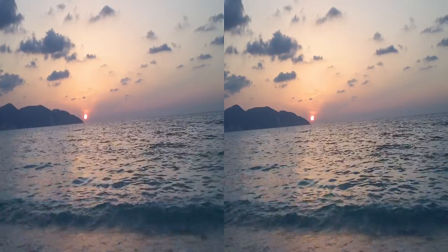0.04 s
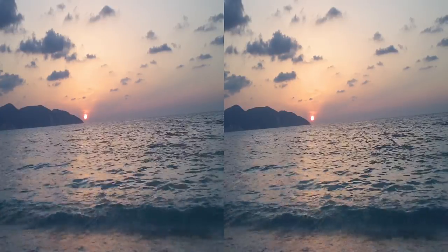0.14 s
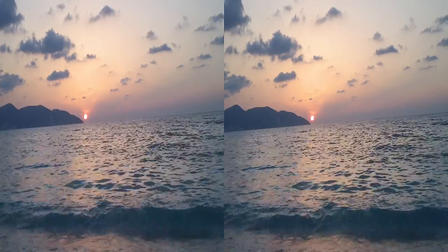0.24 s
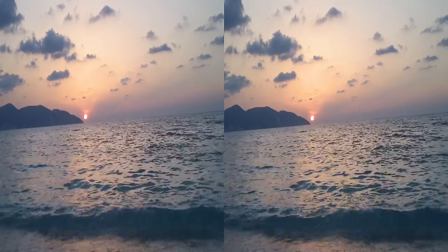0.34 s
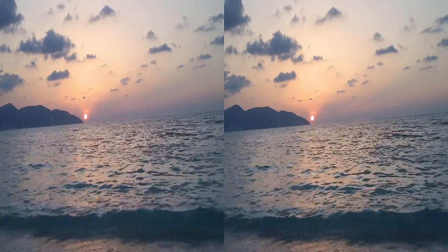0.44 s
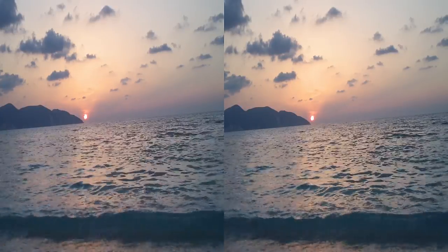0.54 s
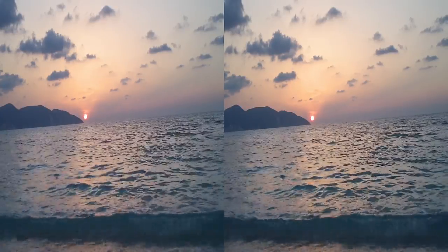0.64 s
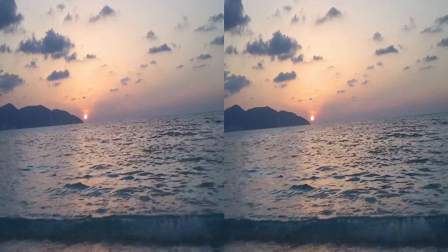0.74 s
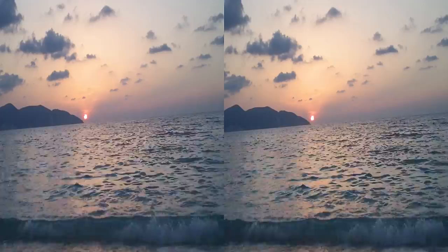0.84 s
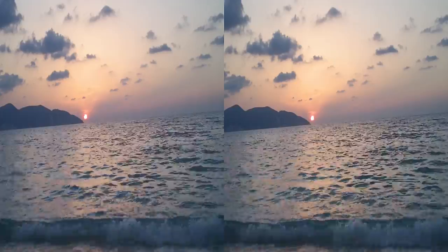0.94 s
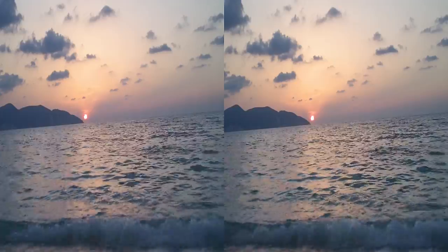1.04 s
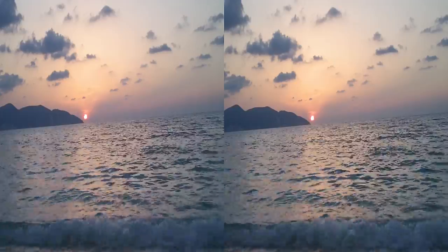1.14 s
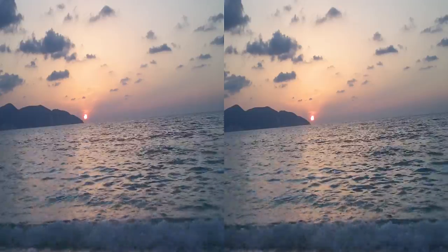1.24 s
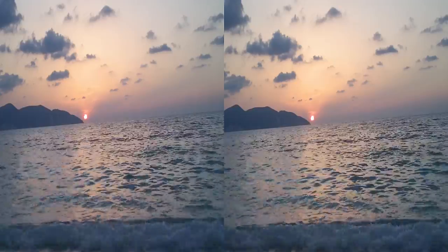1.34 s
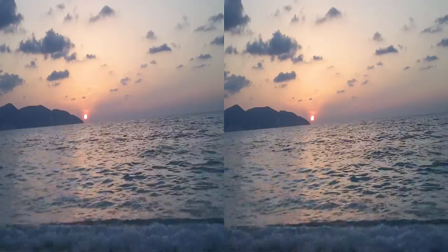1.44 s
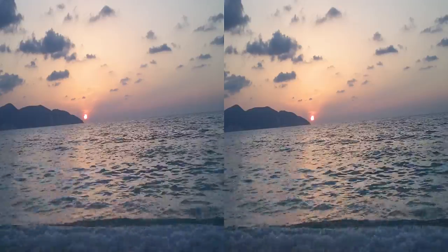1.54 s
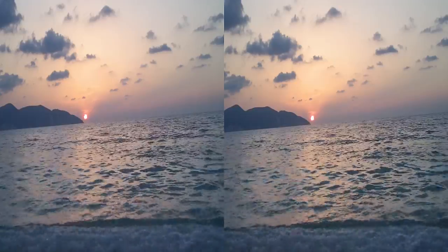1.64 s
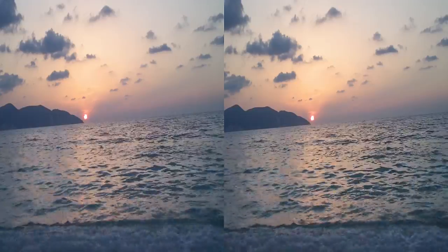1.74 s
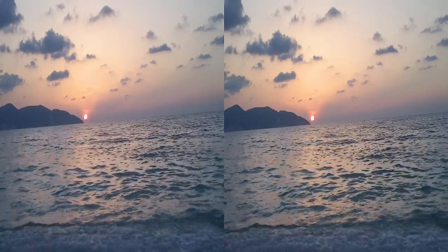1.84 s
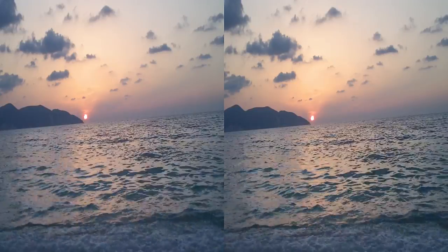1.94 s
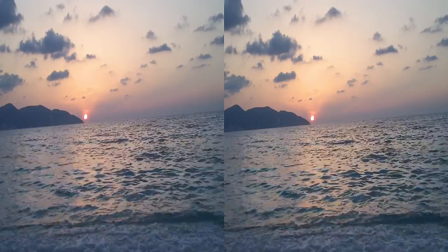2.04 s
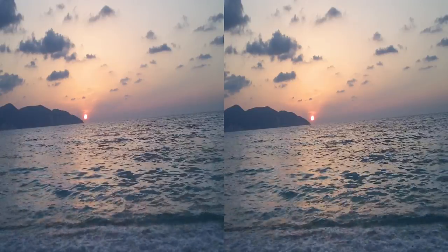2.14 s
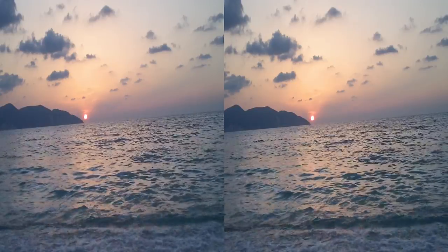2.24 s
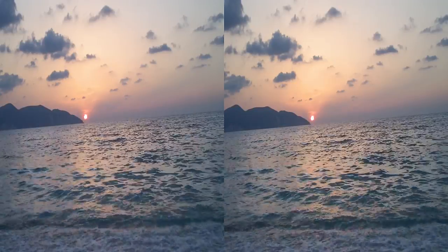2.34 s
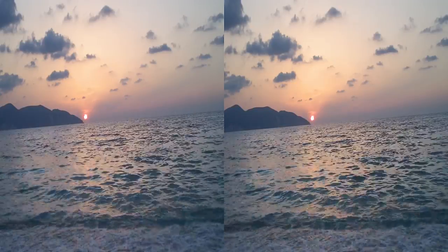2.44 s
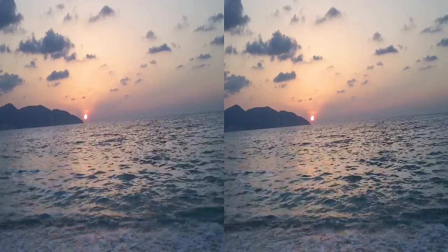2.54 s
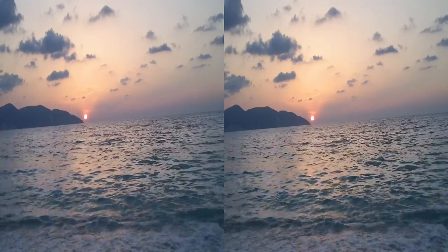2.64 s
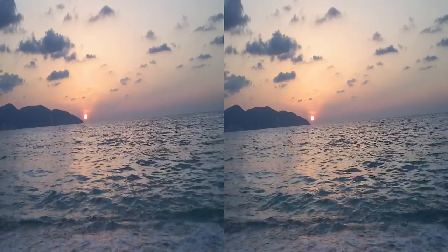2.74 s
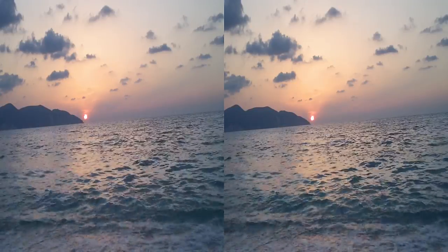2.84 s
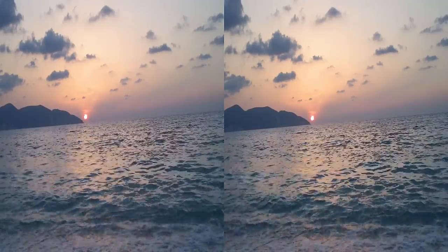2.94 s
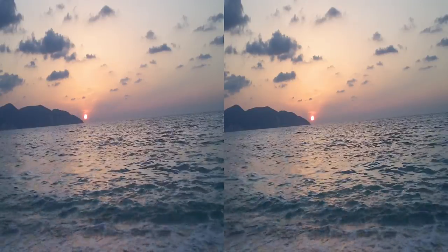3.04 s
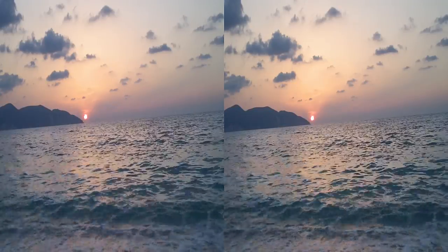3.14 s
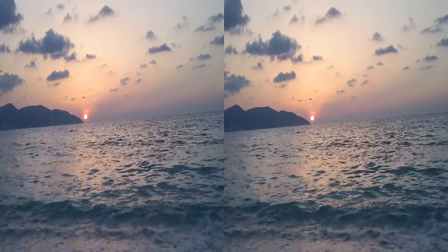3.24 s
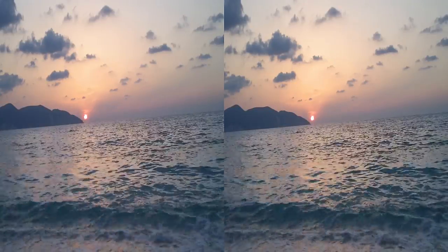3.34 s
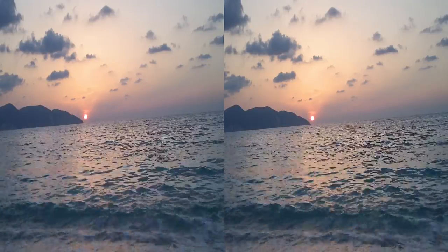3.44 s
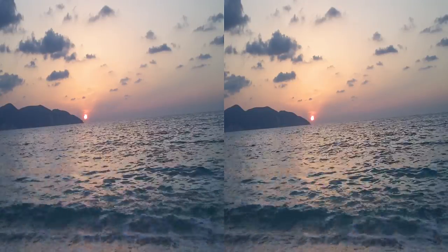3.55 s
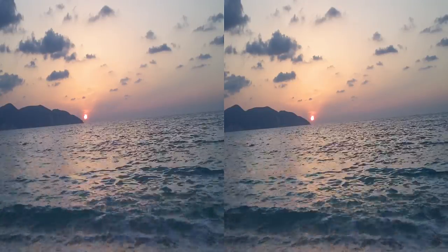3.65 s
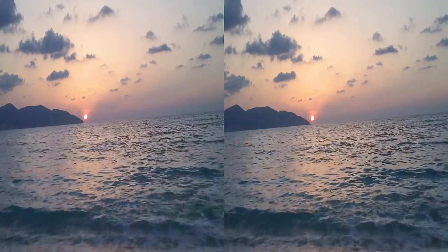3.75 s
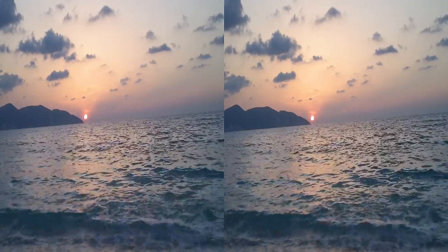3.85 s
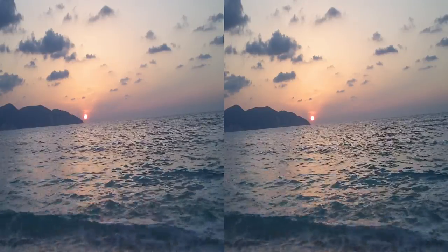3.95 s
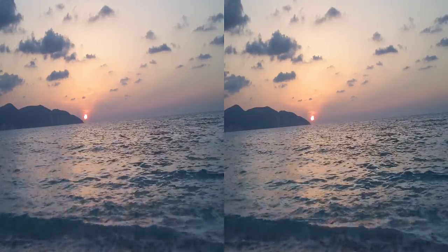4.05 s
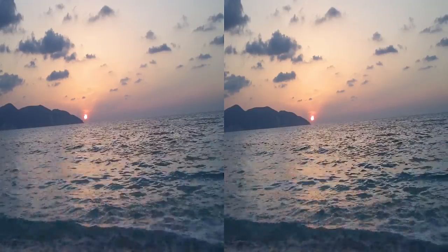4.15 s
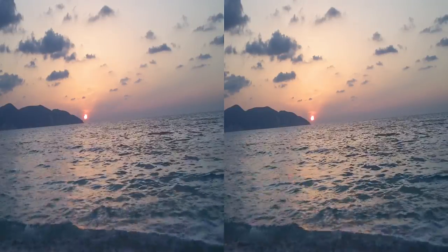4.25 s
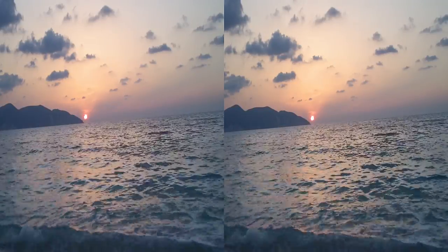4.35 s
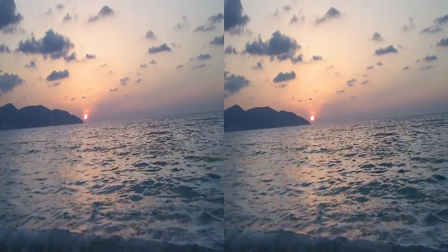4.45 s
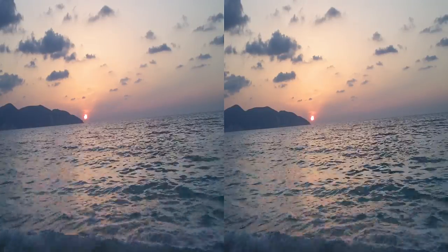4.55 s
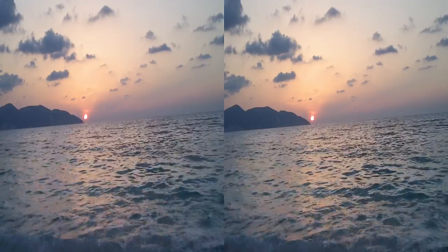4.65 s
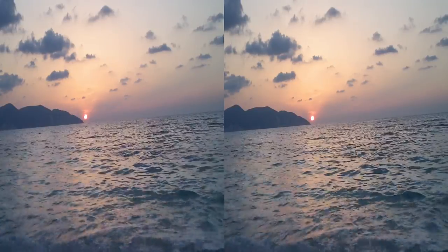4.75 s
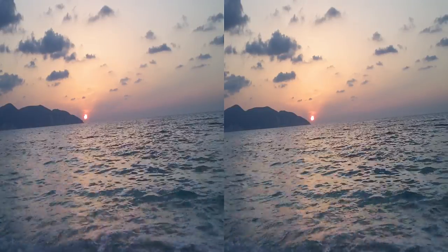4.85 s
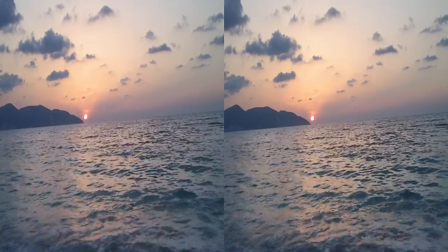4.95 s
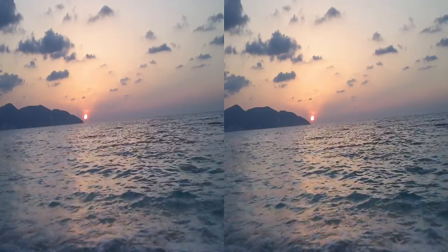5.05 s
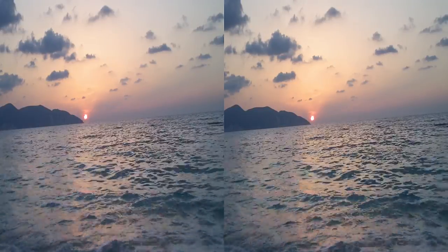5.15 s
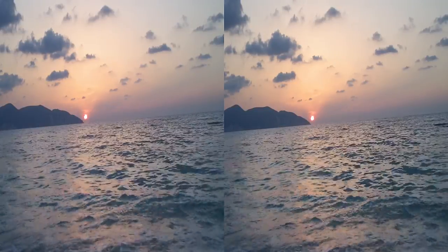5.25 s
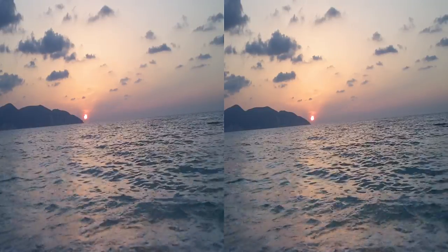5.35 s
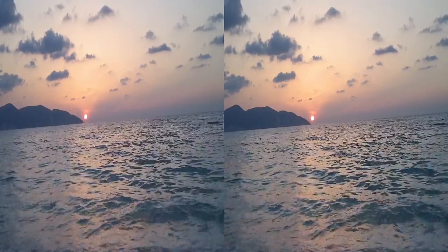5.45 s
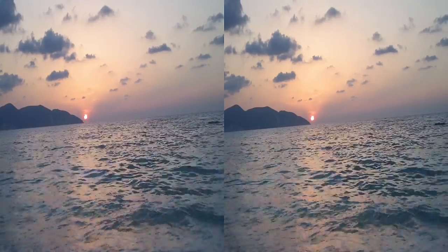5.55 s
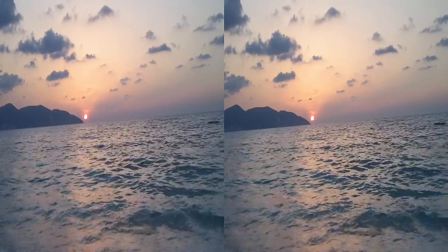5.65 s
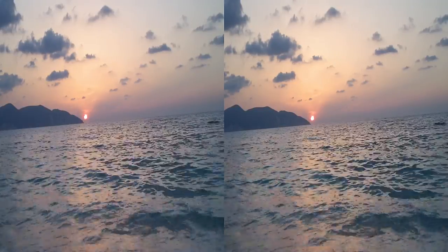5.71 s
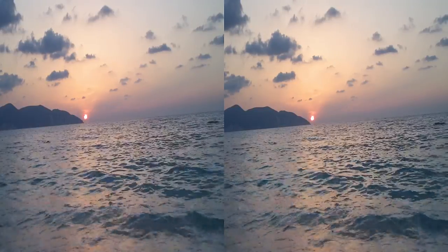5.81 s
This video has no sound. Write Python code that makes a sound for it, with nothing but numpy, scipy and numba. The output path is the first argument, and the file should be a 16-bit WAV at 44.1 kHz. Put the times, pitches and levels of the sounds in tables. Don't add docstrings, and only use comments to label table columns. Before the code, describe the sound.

Loud low wind buffeting thumps the microphone throughout, wide and occasionally distorting. Behind it, faint water hiss, then a small wave breaks just before one second with gulping bubbles, washes out in a long fading rush, and a second, softer wave breaks between four and five seconds. Outdoors at the waterline, close hand-held stereo microphone.

```python
import sys
import numpy as np
from scipy import signal
from scipy.fft import rfft, irfft
from scipy.io import wavfile
from scipy.ndimage import uniform_filter1d
from numba import njit

SR = 44100
rng = np.random.default_rng(int(sys.argv[2]) if len(sys.argv) > 2 else 0)


def wrap_up_sound(samples):
    columns = np.atleast_2d(samples).T
    tamed = np.clip(columns, -1, 1)
    steps = np.round(tamed * 32767).astype(np.int16)
    wavfile.write(sys.argv[1], SR, steps)


def voltage_ratio(level):
    return 10 ** (np.asarray(level, float) / 20)


N = 259308
HZ = np.maximum(np.arange(N // 2 + 1) * SR / N, 1.)


def colour(table):
    hz, db = np.transpose(table)
    return voltage_ratio(np.interp(np.log(HZ), np.log(hz), db))


def curves(table):
    s, *columns = np.transpose(table)
    return np.array([np.interp(np.arange(N) / SR, s, column) for column in columns])


def walk(rate_hz):
    hold = max(int(SR / rate_hz), 2)
    steps = np.repeat(rng.standard_normal(N // hold + 1), hold)[:N]
    drift = uniform_filter1d(uniform_filter1d(steps, hold), hold)
    return drift / drift.std()


# (frequency [Hz], level [dB per Hz])
SUM_COLOUR = [(50, -44), (150, -8.5), (300, 1.5), (800, -1), (1200, -5), (2000, -11), (4000, -20),
              (6000, -21), (8000, -25), (12000, -26.5), (15500, -36.5)]
# (frequency [Hz], level [dB per Hz])
DIFF_COLOUR = [(100, -19), (300, -9), (600, -5.5), (1000, -6.5), (1500, -10.5), (2500, -11), (4000, -13),
               (6000, -13), (8000, -15.5), (12500, -17), (15500, -21.5)]
# (low edge [Hz], high edge [Hz])
SUM_BANDS = [(700, 1500), (380, 650), (2000, 3500), (4200, 6500)]
# (low edge [Hz], high edge [Hz])
DIFF_BANDS = [(800, 2500), (3500, 8000), (11000, 15000)]


def surf():
    breaker = froth(5.15, 2.6, 0.36)
    scatter = froth(3.0, 2.5, 0.65)
    sum_gain, diff_gain = colour(SUM_COLOUR), colour(DIFF_COLOUR)
    sum_rows, diff_rows, foam_aim, treble_db = layers()
    sum_db = swell(sum_rows, SUM_BANDS, sum_gain)
    diff_db = swell(diff_rows, DIFF_BANDS, diff_gain)
    aim_rows = np.clip([foam_aim, 0 * foam_aim - .1, 0 * foam_aim], -1, 1)
    aim = np.log([1500, 3800, 8500]), aim_rows

    for hz, db in zip((7500, 13000), treble_db):
        gap_db = 20 * np.log10(np.interp(hz, HZ, diff_gain / sum_gain))
        row = blend(np.log(hz), *diff_db) + db + gap_db + 1.6 * walk(22.06)
        sum_db = np.append(sum_db[0], np.log(hz)), np.vstack([sum_db[1], row])

    late = np.exp(-1j * np.interp(np.log(HZ), np.log([700, 2500]), [1.95, 1.45]))
    centres = np.log(70 * 2 ** np.arange(0, 8.6, .5))
    total, diff, shared = 0, 0, walk(26.64)
    for k, at in enumerate(centres):
        band = np.sqrt(np.interp(np.log(HZ), centres, np.arange(len(centres)) == k))
        shared = 0.94 * shared + 0.33 * walk(7.0)
        flicker_db = 0.68 * shared + 0.4 * walk(25.44) + gulps(at)
        side = np.sin(np.arcsin(blend(at, *aim)) + 0.12 * walk(8.9))
        crest = irfft(band ** 2 * sum_gain * breaker, N)
        total = total + voltage_ratio(blend(at, *sum_db) + flicker_db) * crest
        aside = side * irfft(band ** 2 * diff_gain * breaker * late, N)
        around = np.sqrt(1 - side ** 2) * irfft(band ** 2 * diff_gain * scatter, N)
        diff = diff + voltage_ratio(blend(at, *diff_db) + flicker_db) * (aside + around)
    return np.array([total, diff])


def froth(cycles, spread_db, share, count=50000):
    when, pitch, loudness = rng.random((count, 3)).T
    turn = 2 * np.pi * (150 + 15500 * pitch ** 2) / SR
    fade = turn / (2 * np.pi * cycles)
    size = voltage_ratio(np.minimum(-spread_db * np.log(loudness), 11))
    start = (when * N).astype(np.int64)
    pops = rfft(ring(start, turn, fade, 0.052 * turn * fade, size, count=N))
    pops /= np.sqrt(uniform_filter1d(abs(pops) ** 2, size=601) / N)
    share = np.clip(share, 0, 1)
    rush = rfft(rng.standard_normal(N))
    return np.sqrt(share) * pops + np.sqrt(1 - share) * rush


@njit
def ring(start, turn, fade, glide, size, count):
    out = np.zeros(count)
    for k in range(len(start)):
        step = np.exp(1j * turn[k] - fade[k])
        rise = np.exp(1j * glide[k])
        state = size[k] + 0j
        for i in range(start[k], min(count, start[k] + int(5 / fade[k]))):
            state *= step
            step *= rise
            out[i] += state.imag
    return out


# (time [s], surge level [dB], spray against surge [dB])
SURGE = [(0, -43, -2.5), (.3, -41.5, -5), (.62, -41, -2), (.7, -32.5, 1), (.8, -27.5, -4.5),
         (.98, -20, -10.5), (1.34, -18.8, -14), (1.75, -21, -15.5), (2.25, -25.5, -18), (2.65, -29, -15.5),
         (3.1, -33, -16.5), (3.52, -35, -12.5), (3.95, -29, -14), (4.4, -29, -15), (4.68, -24.5, -12.5),
         (4.9, -25, -14), (5.1, -29.5, -13.5), (5.88, -35, -13.5)]
# (time [s], foam place [sine of angle], spray place [sine of angle])
AIM = [(0, 0.81, 0.81), (.6, 0.79, 0.49), (.85, 0.55, 0.26), (1.2, 0.58, 0.58), (1.5, 0.75, 0.78),
       (1.9, 0.87, .93), (2.3, .99, 1), (3.0, .99, 1.06), (3.42, .99, 1.02), (3.6, .99, 1.25),
       (3.95, 0.93, 1.19), (4.25, 0.8, 0.8), (4.5, 0.45, 0.45), (4.75, 0.22, 0.24), (5.05, 0.51, 0.53),
       (5.3, 0.9, 0.87), (5.88, 1, 0.86)]
# (time [s], level over the surge [dB])
RIPPLES = [
    (.39, 0.5),
    (1.34, 0.5),
    (2.17, 1),
    (2.85, 2.2),
    (3.09, 0.5),
    (4.07, -1),
    (4.88, 1.2),
    (5.3, 0.5),
    (5.53, 2.5),
]
# (surge level [dB], splash against surge [dB])
SPLASH_LAW = [(-36, -3.2), (-26.5, 4), (-33.5, 2.5), (-25, 0.5), (-30.5, -2.95)]
# (aim [sine of angle], level [dB])
ABOVE_NULL_LAW = [(.3, -8.5), (.45, -15), (.8, -17), (1.1, -12.5), (1.3, -6)]


def layers():
    t = np.arange(N) / SR
    surge, spray = curves(SURGE)
    foam_aim, spray_aim = curves(AIM)
    for s, db in RIPPLES:
        length_s = np.where(t < s, 0.034, 0.049)
        surge = surge + db * np.exp(-((t - s) / length_s) ** 2)

    late_surge = np.interp(t - 0.057, t, surge)
    plunge = -34.5 + .8 * (late_surge + 30) - 15 * np.maximum(spray_aim - .95, 0)
    splash = surge + np.interp(surge, *np.transpose(SPLASH_LAW)) + 0.45 * spray
    total = [surge, plunge, splash, surge + spray]

    wash = surge - 15 + 11.5 * foam_aim
    hiss = surge + spray - 9 + 18.5 * spray_aim
    fizz = hiss + 4 - 16 * np.minimum(spray_aim, 1.1)

    below_null = -3.7 - 16 * spray_aim ** 2
    above_null = np.interp(spray_aim, *np.transpose(ABOVE_NULL_LAW))
    return total, [wash, hiss, fizz], foam_aim, [below_null, above_null]


def swell(db, bands, gain):
    own = []
    for lo, hi in bands:
        power = 2 * np.sum(gain[(HZ > lo) & (HZ < hi)] ** 2) / N
        own.append(10 * np.log10(power))
    centre = np.log(np.prod(bands, axis=1)) / 2
    order = np.argsort(centre)
    return centre[order], (np.array(db) - np.array(own)[:, None])[order]


def blend(at, centre, rows):
    place = np.interp(at, centre, np.arange(len(centre)))
    k = min(int(place), len(centre) - 2)
    return rows[k] + (place - k) * (rows[k + 1] - rows[k])


# (time [s], pitch [Hz], level over the surge [dB])
GULPS = [(.875, 920, 19), (1.03, 550, 10.5), (1.195, 980, 5), (1.205, 357, 15), (1.255, 684, 12.5),
         (1.325, 484, 21), (1.405, 990, 6), (1.465, 880, 11), (1.52, 447, 16), (4.35, 900, 7),
         (4.565, 970, 13), (4.67, 1400, 11)]


def gulps(at, length_ms=14, reach=0.18):
    t = np.arange(0, N, 32) / SR
    extra_db = 0
    for s, hz, db in GULPS:
        near_time = ((t - s) * 1000 / length_ms) ** 2
        near_pitch = ((at - np.log(hz)) / reach) ** 2
        extra_db = extra_db + db * np.exp(-near_time - near_pitch)
    return np.interp(np.arange(N) / SR, t, extra_db)


# (time [s], level [dB], treble limit [Hz], length [ms])
SPLASHES = [
    (.393, -20.5, 1210, 7.5),
    (4.318, -29, 8900, 9.7),
    (4.349, -18, 1100, 3),
]


def splashes():
    t, out = np.arange(N) / SR, 0
    for s, db, hz, ms in SPLASHES:
        noise = rfft(rng.standard_normal((2, N)))
        burst = irfft(noise / np.sqrt(1 + (HZ / hz) ** 4), N)
        out = out + voltage_ratio(db) * burst * np.exp(-((t - s) * 1000 / ms) ** 2)
    return out


def buffets(turbulence, width_ms=4.18, sharp=0.28, rise=2.15):
    out, calm = np.zeros((2, N + 2000)), np.ones(N + 2000)
    t = np.arange(-1000, 1000) / SR
    shape = np.exp(-(t * 1000 / width_ms) ** 2 * np.where(t < 0, rise, 1))
    rows = eddies()
    for (s, db, hz, sum_db), turn in zip(rows, rng.random((len(rows), 2))):
        phase = 2 * np.pi * (hz * t * (1 - 25 * t) + turn[:, None])
        swing = np.cos(phase + sharp * np.cos(phase)) * shape
        i = int(s * SR)
        out[:, i:i + 2000] += voltage_ratio(db + np.array([[sum_db], [-.3]])) * swing
        calm[i:i + 2000] *= 1 - shape
    out = signal.sosfilt(signal.butter(2, 50, "high", fs=SR, output="sos"), out)
    return out[:, 1000:N + 1000] + turbulence * calm[1000:N + 1000]


# (time [s], peak level [dB], pitch [Hz], sum against difference [dB])
STRONG_EDDIES = [(.004, 1.5, 223, -13), (.134, -7.6, 181, -12), (.187, -1, 170, -15.5),
                 (.204, -1.5, 180, -14), (.226, -4, 110, -13), (0.283, -6, 182, -12.5),
                 (.435, -.8, 149, -12.5), (0.513, -0.6, 219, -12.5), (.724, -.6, 179, -15.5),
                 (.788, -3, 143, -12.5), (0.965, -5, 149, -11), (1.075, -2.5, 179, -13),
                 (1.773, -4, 160, -14), (2.182, -2, 162, -14.5), (2.504, -5.5, 186, -10),
                 (2.742, 3, 205, -14), (3.323, -6, 156, -19), (3.433, -4, 128, -16), (4.25, -5.5, 163, -11),
                 (4.34, -2, 176, -11.5), (4.42, -6.5, 153, -7), (4.458, -7.7, 180, -10.1),
                 (4.51, -5, 206, -10.5), (4.636, -4.5, 173, -11.5), (4.698, 1.1, 150, -23),
                 (4.749, 2, 140, -17.5), (4.921, 0.5, 202, -16), (5.013, -3, 204, -12.5),
                 (5.727, -4, 181, -13), (5.782, -2.5, 130, -15)]


def eddies(count=60):
    u, g = rng.random(count), rng.standard_normal((count, 3)).T
    push = np.cumsum(voltage_ratio(curves(GUST)[0]))
    s = np.interp((np.arange(count) + u) / count, push / push[-1], np.arange(N) / SR)
    peak_db = -8.5 + 1.6 * g[0]
    pitch_hz = 165 + 28 * g[1]
    sum_db = -14 + 2 * g[2]
    return np.vstack([np.transpose([s, peak_db, pitch_hz, sum_db]), STRONG_EDDIES])


# (frequency [Hz], level [dB per Hz])
WIND_COLOUR = [(20, -34), (45, -13), (79, -2), (115, 0.5), (215, -4.5), (300, -13), (400, -19.5),
               (600, -42.5), (1000, -40), (2000, -66)]
# (time [s], level [dB])
GUST = [(0, -18), (.33, -19), (.44, -14.5), (.66, -21.5), (1.0, -19.5), (1.43, -24.5), (1.8, -19.5),
        (2.4, -24), (3.0, -22.5), (3.4, -20.5), (3.63, -25.5), (3.85, -20.5), (4.25, -24), (4.45, -19.5),
        (4.88, -16.5), (5.17, -19.5), (5.88, -18.2)]


def wind(sum_db=-14, eddy_db=2.0, lull_db=1.9):
    ports = []
    for _ in range(2):
        lumps = voltage_ratio(eddy_db * walk(70) + lull_db * walk(14))
        ports.append(rng.standard_normal(N) * lumps)
    left, right = irfft(rfft(np.array(ports)) * colour(WIND_COLOUR), N)
    pair = np.array([voltage_ratio(sum_db) * (left + right), left - right])
    return pair / pair[1].std() * voltage_ratio(curves(GUST)[0] + 1.6)


def scene():
    total, diff = surf() + splashes() + buffets(wind())
    return np.array([total + diff, total - diff])


def low_pass(x):
    return signal.sosfilt(signal.butter(12, 15620, fs=SR, output="sos"), x)


def record(dry):
    null_hz, null_width_hz, top_hz = 9850, 750, 15350
    off = np.maximum(abs(HZ - null_hz) - 350, 0) / null_width_hz
    notch = off ** 2 / (1 + off ** 2)
    wet = irfft(rfft(dry) * notch * (HZ < top_hz), N)
    return low_pass(np.clip(wet, -1, 1))


dry = scene()
out = record(dry)
wrap_up_sound(out)
```